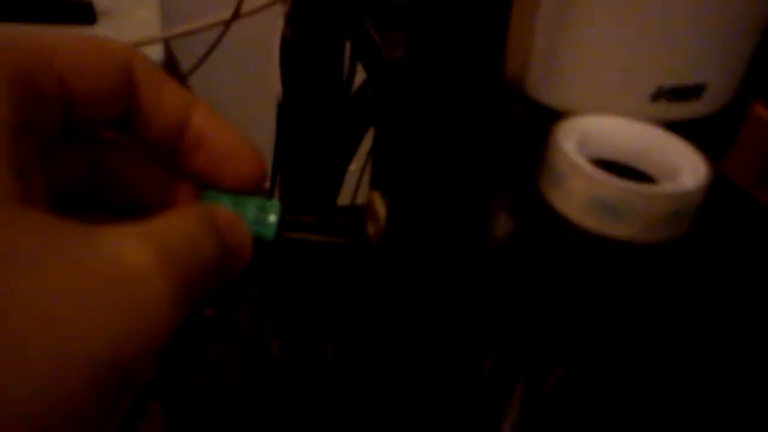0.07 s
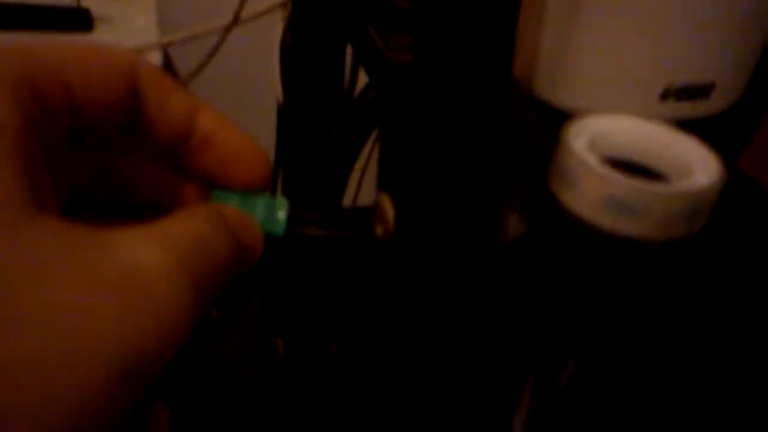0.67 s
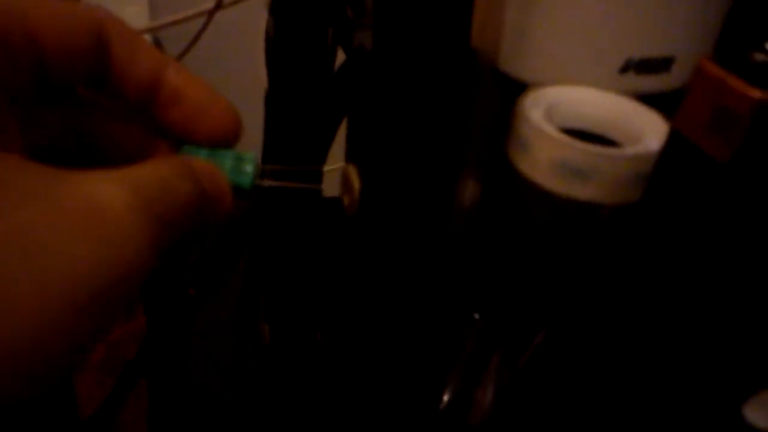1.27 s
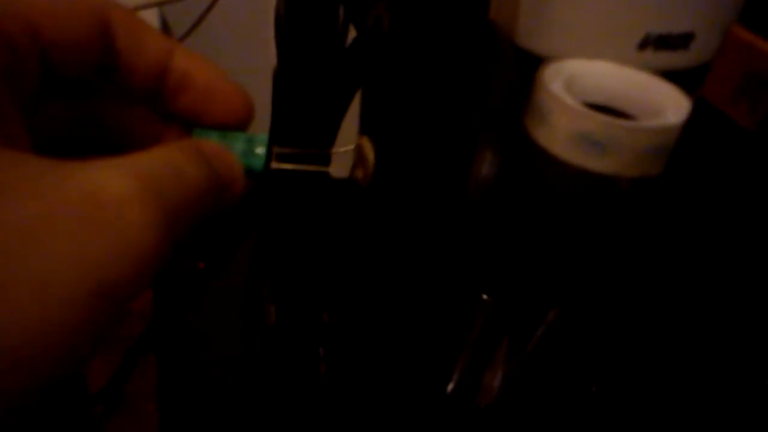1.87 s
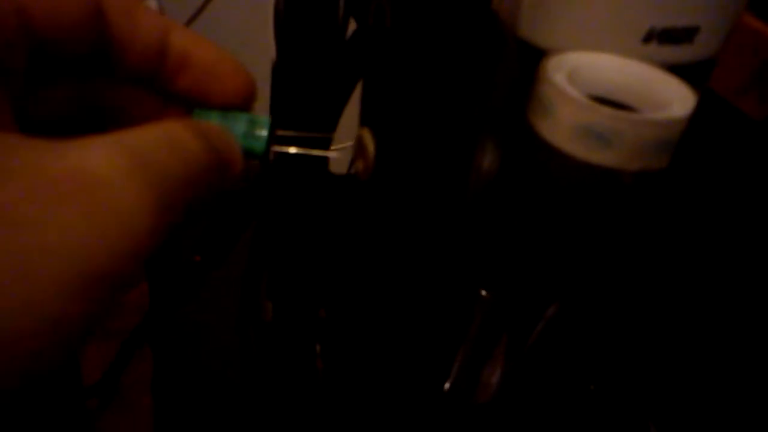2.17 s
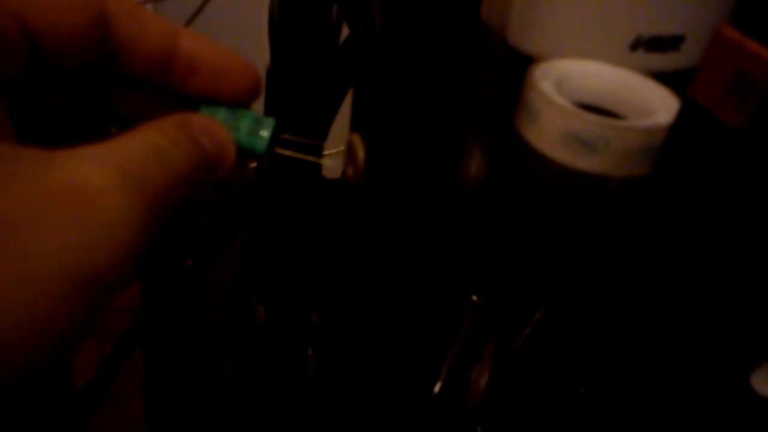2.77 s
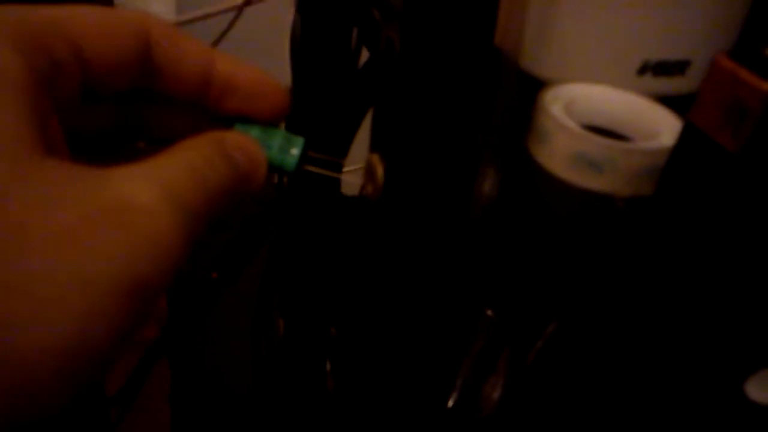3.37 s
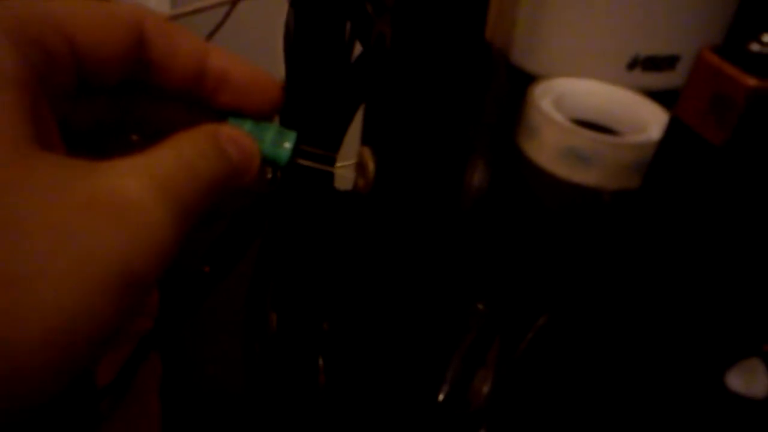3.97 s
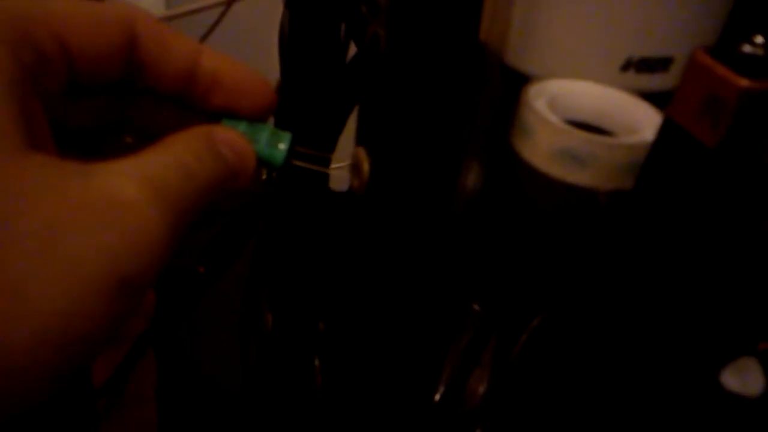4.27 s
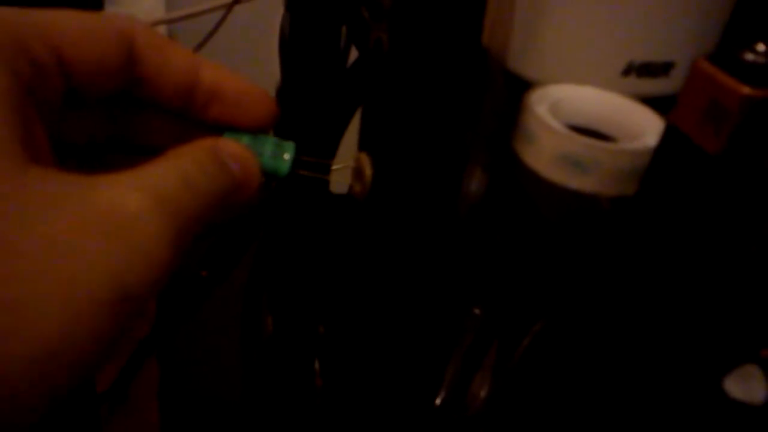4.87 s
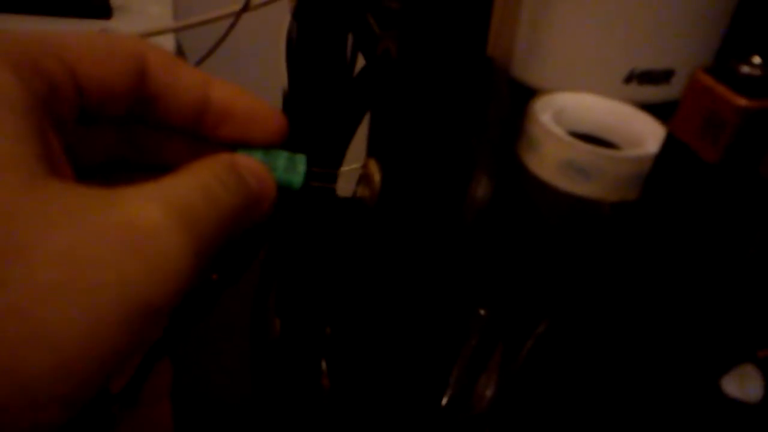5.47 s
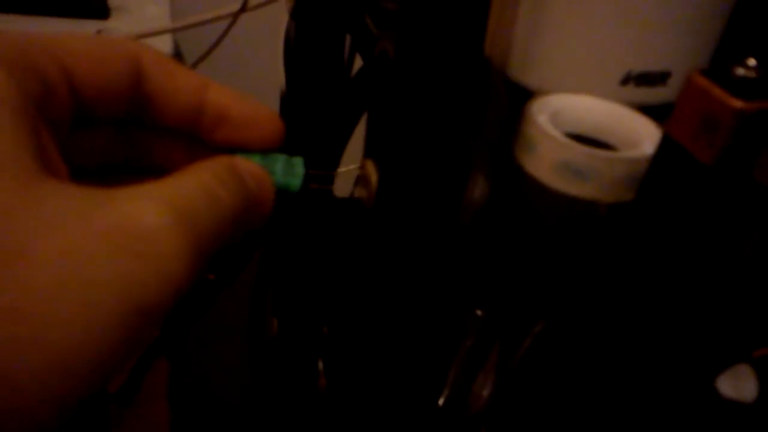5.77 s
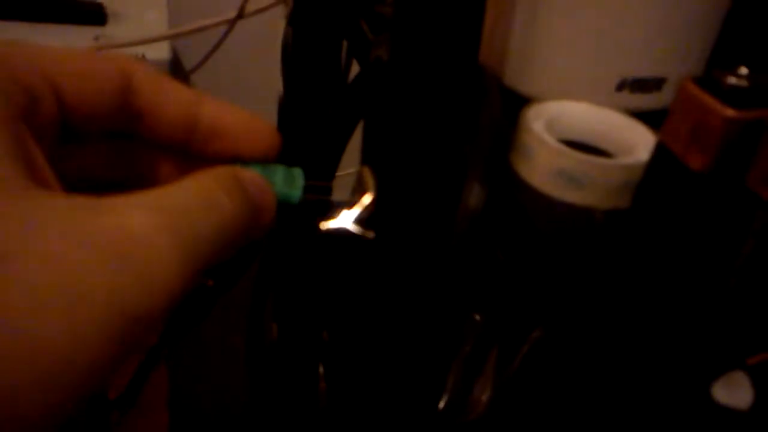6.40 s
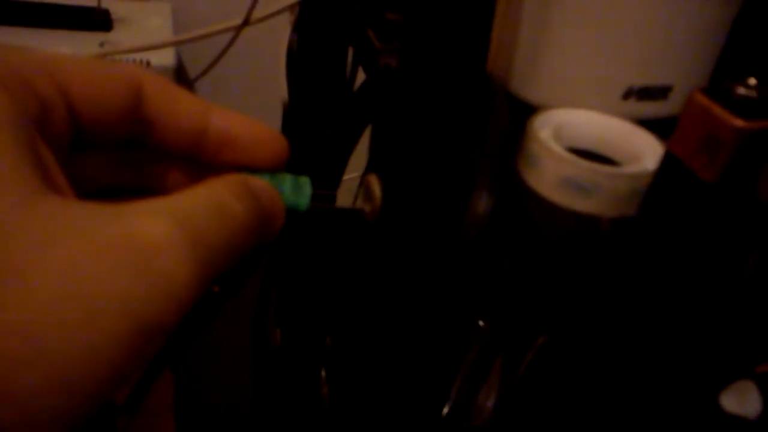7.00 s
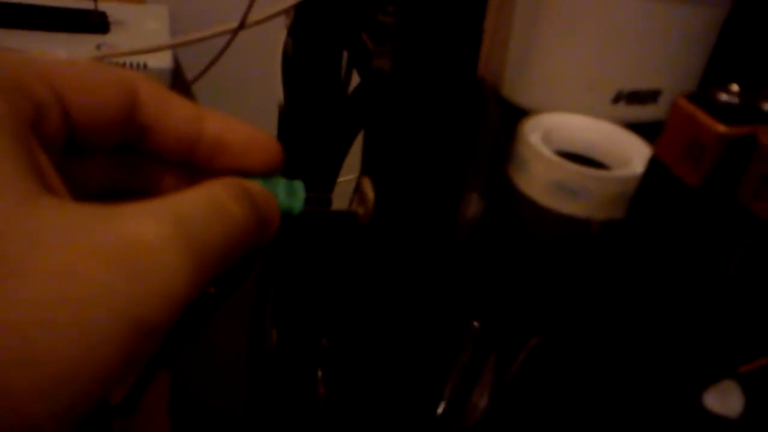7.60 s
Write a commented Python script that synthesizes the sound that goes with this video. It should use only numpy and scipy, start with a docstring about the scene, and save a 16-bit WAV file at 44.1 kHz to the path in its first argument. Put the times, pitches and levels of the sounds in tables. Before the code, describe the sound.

A capacitor discharges with a sharp, loud crack and a quick second snap, after soft fumbling over faint hiss and hum.

```python
"""A charged capacitor sparks against a contact on a workbench: a crack, a second snap, two tiny spits.
Each spark sends out a shock of air that shakes the bench and rings out in the small room; the first
two overload the microphones. Before that, the capacitor's leads knock and tick as they feel for the
contact. Underneath are soft handling bumps, quiet room air, a low hum and a faint hiss."""
import sys
import numpy as np
from scipy import signal
from scipy.fft import rfft, irfft
from scipy.io import wavfile

SR = 44100
rng = np.random.default_rng(int(sys.argv[2]) if len(sys.argv) > 2 else 0)


def persist_wave(psi):
    """Save psi, clipped to +-1, as 16-bit WAV."""
    counts = np.round(np.clip(psi, -1, 1) * 32767).astype(np.int16)
    wavfile.write(sys.argv[1], SR, np.atleast_2d(counts).T)


N = 336924
TIME = np.arange(N) / SR
FREQS = np.maximum(np.arange(N // 2 + 1) * SR / N, 1)

# Dull knocks on the bench. Each row: start in seconds, strength in dB, brightness in Hz.
BENCH_KNOCKS = [(1.6054, -36.5, 880), (1.6957, -36.5, 800), (1.7094, -37, 2400)]
# A lead taps the metal contact. Each row: start in seconds, strength in dB.
LEAD_TICKS = [(3.8850, -40), (3.8888, -38), (3.8908, -39), (3.8945, -41.5)]


def from_db(db):
    """Turn decibels into a number to multiply by."""
    return 10 ** (np.asarray(db) / 20)


def rms_one(x):
    """Scale a sound so that its average level (rms) is 1."""
    return x / np.sqrt(np.mean(x ** 2) + 1e-20)


def over_hz(points, column=1):
    """Join a table's points into a curve over all frequencies."""
    table = np.array(points)
    return np.interp(np.log(FREQS), np.log(table[:, 0]), table[:, column])


def one_pole(x, hz, kind):
    """A gentle filter that keeps the "low" or the "high" side of hz."""
    return signal.lfilter(*signal.butter(1, min(hz, SR * .45), kind, fs=SR), x)


def band(x, edges_hz, order):
    """Keep the sound between two frequencies, at average level 1."""
    return rms_one(signal.sosfilt(signal.butter(order, edges_hz, "band", fs=SR, output="sos"), x))


def click(start, db):
    """A push one sample long."""
    return from_db(db) * (np.arange(N) == round(start * SR)) + 1e-18


def swell(peak_s, db, width_s):
    """A bell-shaped rise and fall of level."""
    return from_db(db) * np.exp(-.5 * np.minimum(((TIME - peak_s) / width_s) ** 2, 100))


def fade(t60):
    """One second of dying away; t60, the fade time, is how long a 60 dB drop takes."""
    return np.exp(-np.log(1000) * TIME[:SR] / t60)


def ring(force, modes, spread_db=0):
    """A struck object rings with its own tones (modes), each a dying sine wave."""
    out = np.zeros(N)
    for hz, db, t60 in modes:
        decay, angle = from_db(-60 / (t60 * SR)), 2 * np.pi * hz / SR
        gain = from_db(db + spread_db * rng.standard_normal())
        feedback = [1, -2 * decay * np.cos(angle), decay * decay]
        out += gain * signal.lfilter([0, np.sin(angle)], feedback, force + 1e-18)
    return out


def convolve(x, response):
    """Send one sound through a left and a right pattern of echoes."""
    return signal.fftconvolve(x[None], response, axes=1)[:, :N]


def diffuse(gain):
    """Noise from all around, shaped by gain: left and right are alike in the bass, not in the treble."""
    # Each row: frequency in Hz, how alike the two sides are (1 is the same, 0 is unrelated).
    likeness = [(50, 0.54), (130, 0.93), (300, 0.93), (640, 0.65), (1400, 0.0047), (3000, -0.22),
                (7000, 0.061)]
    mid, side = rfft(rng.standard_normal((2, N)))
    alike = np.clip(over_hz(likeness), -1, 1)
    pair = np.sqrt(1 + alike) * mid + np.sqrt(1 - alike) * side * [[1], [-1]]
    return rms_one(irfft(pair * gain, N))


def mic_ports():
    """The two microphone openings resonate, so each colours the treble in its own way."""
    # Each row: frequency in Hz, left gain in dB, right gain in dB.
    port_gains = [(1000, 0, 0), (2200, -.5, 0), (4500, 0, -1.5), (7500, 1, -3), (9400, 4, -2),
                  (10500, .5, -2), (11500, 0, 0), (12600, -1, 3), (13800, -1.5, 3), (15400, -1.5, 2)]
    return from_db([over_hz(port_gains, column=1), over_hz(port_gains, column=2)])


def wavering_tone(hz, width_hz):
    """Noise so narrow in pitch that it sounds like an unsteady tone."""
    return diffuse(1 / (1 + (2 * (FREQS - hz) / width_hz) ** 2))


def hiss(level_db=-63.5, flutter_hz=15.48, flutter_depth=.18, fall_s=.12, hold_s=.18):
    """A thin, fluttering hiss that now and then sinks, stays low and comes back."""
    # The hiss's colour. Each row: frequency in Hz, relative level in dB.
    colour = [(4000, -43.5), (7800, -21), (9200, -1), (10200, 1), (12800, -5), (13500, -10), (16000, -9.5)]
    # Each row: start of a dip in seconds, depth in dB, recovery time in seconds.
    dips = [(-.25, 9, .08), (1.89, 10, 0.1), (4.07, 8, .09), (6.39, 12, 0.15)]
    db = level_db
    for start, depth_db, recovery in dips:
        fall = np.clip((TIME - start) / fall_s, 0, 1)
        since_hold = np.maximum(TIME - start - fall_s - hold_s, 0)
        db = db - depth_db * fall * np.exp(-since_hold / recovery)
    flutter = 1 + flutter_depth * np.sin(2 * np.pi * flutter_hz * TIME)
    return from_db(db) * flutter * diffuse(from_db(over_hz(colour)) * mic_ports())


def background(air_db=-54):
    """Room air, a wavering hum, the hiss and a faint electronic whine."""
    # The air's colour. Each row: frequency in Hz, relative level in dB.
    air_colour = [(25, -4.5), (70, -4), (115, -4.5), (160, -6.5), (270, -5), (450, -9.5), (750, -11.5),
                  (1300, -13), (1900, -18), (3000, -22), (5000, -29.5), (7500, -35), (16000, -33)]
    # Each row: pitch of a hum tone in Hz, width in Hz, level in dB.
    hum_tones = [(119.7, 9.5, -62.5), (189.6, 5, -62.5), (295, 3.8, -66), (377.5, 2.2, -66.5)]
    air = from_db(air_db) * diffuse(from_db(over_hz(air_colour)))
    hum = sum(from_db(db) * wavering_tone(hz, width) for hz, width, db in hum_tones)
    whine_gain = from_db([[-98], [-79]])   # left, right
    return air + hum + hiss() + whine_gain * wavering_tone(12665.5, width_hz=31)


def handling(top_hz=65, trim_db=-4.5, lean_left_db=2):
    """The hand that holds the microphones shifts with soft, deep bumps."""
    # Each row: time of a bump's peak in seconds, relative level in dB.
    bumps = [(0.299, -49), (1.179, -42.5), (1.709, -49.5), (2.019, -50.5), (2.639, -43.5), (3.359, -44),
             (3.849, -44.5), (4.409, -43), (6.679, -52)]
    level = sum(swell(peak, db + trim_db, width_s=.05) for peak, db in bumps)
    rumble = diffuse(1 / (1 + (FREQS / top_hz) ** 4))
    return level * rumble * from_db([[lean_left_db], [-lean_left_db]])


def room_response(build_s=.0097):
    """The room's answer to a click: reflections thicken, then die away band by band."""
    # Each row: centre of a band in Hz, relative level in dB, fade time in seconds.
    bands = [(200, -14, .45), (700, -16, .42), (1400, -12.5, .44), (2900, -3, .46), (5500, -3.5, .45),
             (9000, -1, .39), (12500, -.5, .35), (15500, 1, .33)]
    spectrum = rfft(diffuse(from_db(over_hz(bands)) * mic_ports()))
    centres = np.log([row[0] for row in bands])
    tail = 0
    for this_band, (_, _, t60) in zip(np.eye(len(bands)), bands):
        share = np.interp(np.log(FREQS), centres, this_band)
        tail = tail + irfft(spectrum * share, N)[:, :SR] * fade(t60)
    build_up = 1 - np.exp(-TIME[:SR] / build_s)
    return rms_one(tail * build_up) / np.sqrt(SR)


def scuffs(grain_db=4, skid_lag_s=.004, scratch_s=.0018):
    """Surfaces slip in tiny uneven jerks: knocks skid, contacts scratch, fingers rub."""
    # Each row: time of a rub's peak in seconds, level in dB, width in seconds.
    finger_rubs = [(1.618, -52.5, 0.015), (1.658, -56, .008), (1.725, -52.5, 0.027), (1.865, -60, 0.049)]
    skids = sum(swell(start + skid_lag_s, db - 15, width_s=.0033) for start, db, _ in BENCH_KNOCKS)
    scratches = sum(swell(start, db - 12, scratch_s) for start, db in LEAD_TICKS)
    scratches += sum(swell(start, db - 20.5, scratch_s) for start, db, _ in BENCH_KNOCKS)
    rubs = sum(swell(peak, db, width) for peak, db, width in finger_rubs)
    grit = rms_one(rng.standard_normal(N) * from_db(grain_db * rng.standard_normal(N)))
    return (skids * band(grit, edges_hz=(310, 1360), order=2)
            + scratches * band(grit, edges_hz=(4800, 15200), order=5)
            + rubs * band(grit, edges_hz=(480, 910), order=1))


def bench_knocks():
    """Soft blows make the bench ring, each with its own random mix of tones."""
    # Each row: pitch in Hz, relative level in dB, fade time in seconds.
    knock_modes = [(126.4, -12.5, 0.41), (284, -23, 0.062), (425, -5, 0.019), (567, -9, 0.099),
                   (750, -1, 0.024), (950, -3, 0.028), (1210, -2.5, 0.019), (1422, -7, 0.084),
                   (1680, -32, 0.029), (2850, -4, 0.0074)]
    blows = [one_pole(click(start, db), hz, "low") for start, db, hz in BENCH_KNOCKS]
    return sum(ring(blow, knock_modes, spread_db=6.5) for blow in blows)


def lead_ticks(low_edge_hz=4300):
    """A lead rings as it taps the contact; so thin a wire gives off no bass."""
    # Each row: pitch in Hz, relative level in dB, fade time in seconds.
    wire_modes = [(4810, -16, 0.22), (5060, -9, 0.025), (5760, -6, 0.014), (6370, -9, .01),
                  (8100, -15, .01), (9470, -6.5, 0.013), (9950, -7, 0.015), (12900, -10, .01),
                  (14250, -12, .014)]
    wire = ring(sum(click(start, db) for start, db in LEAD_TICKS), wire_modes)
    return signal.sosfilt(signal.butter(6, low_edge_hz, "high", fs=SR, output="sos"), wire)


def fumbling(room):
    """The leads feel for the contact: knocks, ticks and scuffs, heard directly and through the room."""
    knocks, ticks, slips = bench_knocks(), lead_ticks(), scuffs()
    into_room = from_db(-4) * knocks + from_db(-5) * (ticks + slips)
    return knocks + ticks + slips + convolve(into_room, room)


def mic_overload(rise_s=.00043, coupling_hz=2.7):
    """A shock throws each microphone's signal below zero; it holds, recovers and overshoots."""
    # Each row: start in seconds, left swing, right swing, hold in seconds, recovery in seconds.
    overloads = [(6.0417, 0.52, 0.95, .0046, 0.0042), (6.328, 1.0, .05, .0019, .0027)]
    offset = 0
    for start, left, right, hold, recovery in overloads:
        age = np.maximum(TIME - start, 0)
        swing = (1 - np.exp(-age / rise_s)) * np.exp(-np.maximum(age - hold, 0) / recovery)
        offset = offset - np.outer([left, right], swing)
    return one_pole(offset + 1e-18, coupling_hz, "high")   # the inputs' capacitors cause the overshoot


def sparks(room, direct_db=-10):
    """Each spark's shock arrives directly, scatters nearby, bounces off walls and fills the room."""
    # Each row: start in seconds, shock strength in dB, fade time of the scatter in seconds,
    # bass cut in Hz (higher for a smaller spark), strength sent into the room in dB.
    discharges = [(6.0403, 20.5, .03, 710, 21), (6.3286, 19.5, 0.021, 4360, 7),
                  (6.3755, 1, 0.015, 11000, -27), (6.4043, 5, 0.011, 12600, -24)]
    # Sound scattered off hand and bench. Each row: frequency in Hz, relative level in dB.
    scatter_colour = [(200, -8.5), (800, -2), (2100, -4), (3000, -5.5), (5500, -7), (7300, -5), (9000, 0),
                      (10500, -0.5), (13000, 2), (15500, -6.5)]
    # Tones of the bench and parts. Each row: pitch in Hz, relative level in dB, fade time in seconds.
    bench_modes = [(602, -23, 0.022), (874, -22.5, 0.017), (998, -37, 0.0066), (1547, -26, 0.018),
                   (2180, -28.5, .016)]
    # First echoes from the walls. Each row: delay in seconds, gain in dB.
    wall_echoes = [(.0084, -20.5), (0.0167, -26.5)]
    scatter = diffuse(from_db(over_hz(scatter_colour)) * mic_ports())
    scattered, shocks, on_bench, into_room = 0, 0, 0, 0
    for k, (start, shock_db, t60, low_hz, room_db) in enumerate(discharges):
        pulse = one_pole(click(start, 0), low_hz, "high")
        shock = from_db(shock_db) * pulse
        paths = rms_one(scatter[:, k * SR:(k + 1) * SR] * fade(t60)) / np.sqrt(SR)
        scattered = scattered + convolve(shock, paths)
        shocks = shocks + shock
        on_bench = on_bench + one_pole(shock, low_hz, "high")   # only a long shock shakes the bench
        into_room = into_room + from_db(room_db) * pulse
    bright = one_pole(shocks, hz=6030, kind="high")   # small surfaces return only the treble
    echoes = sum(from_db(db) * np.roll(bright, round(delay * SR)) for delay, db in wall_echoes)
    direct = -from_db(direct_db) * shocks
    return direct + scattered + echoes + ring(on_bench, bench_modes) + convolve(into_room, room)


def scene():
    """All the sounds together at the two microphones."""
    room = room_response()
    return sparks(room) + mic_overload() + fumbling(room) + handling() + background()


def gain_control(x, threshold_db=-12, depth_db=3.5, release_db_per_s=.8, attack_hz=1.5):
    """A loud peak turns the volume down a few dB; it creeps back slowly."""
    peak_db = 20 * np.log10(np.abs(x).max(axis=0) + 1e-9)
    excess_db = np.clip(peak_db - threshold_db, 0, depth_db)
    release_db = release_db_per_s * TIME
    cut_db = np.maximum.accumulate(excess_db + release_db) - release_db
    return x * from_db(-one_pole(cut_db, attack_hz, "low"))


def record(dry, cutoff_hz=15720):
    """Apply the gain control, clip peaks at full scale and cut off the highest treble."""
    clipped = np.clip(gain_control(dry), -1, 1)
    return signal.sosfilt(signal.ellip(10, .2, 70, cutoff_hz, fs=SR, output="sos"), clipped)


dry = scene()
out = record(dry)
persist_wave(out)
```